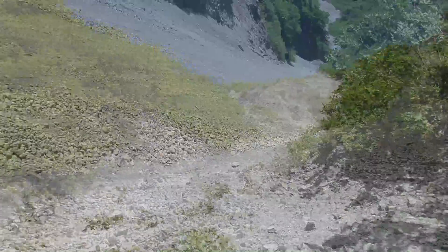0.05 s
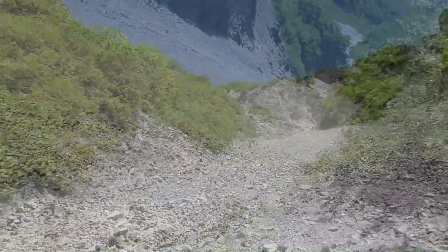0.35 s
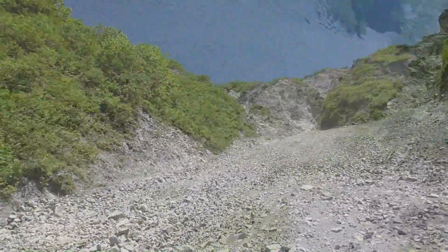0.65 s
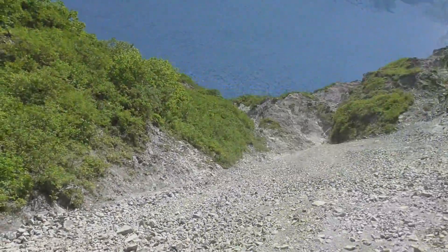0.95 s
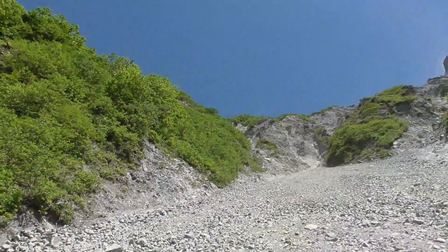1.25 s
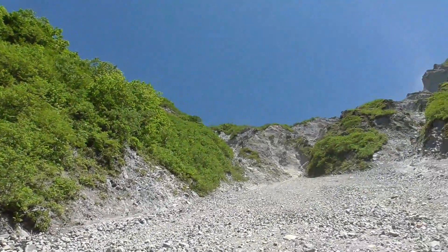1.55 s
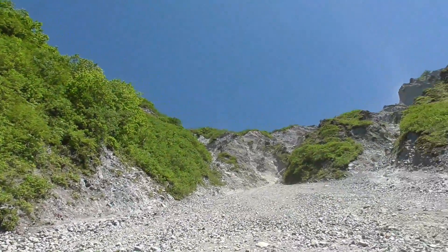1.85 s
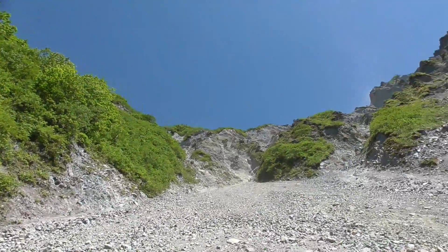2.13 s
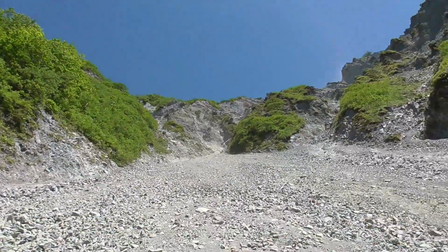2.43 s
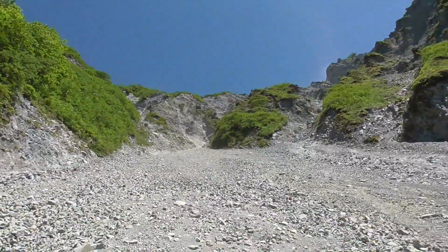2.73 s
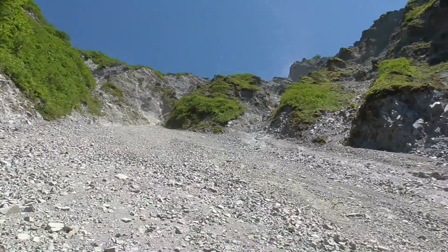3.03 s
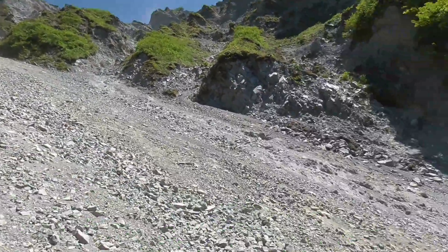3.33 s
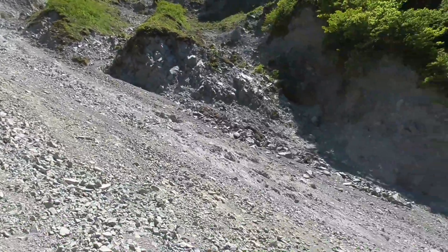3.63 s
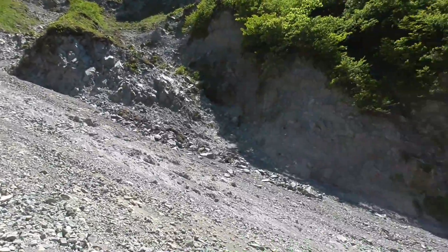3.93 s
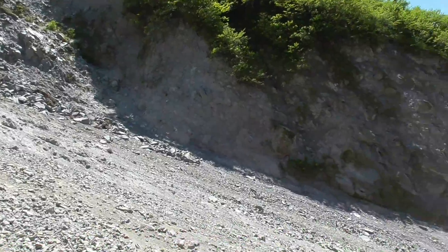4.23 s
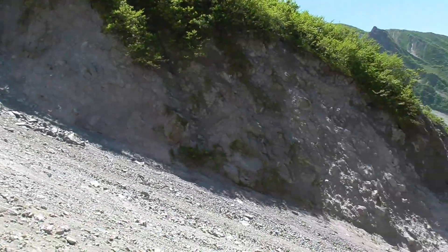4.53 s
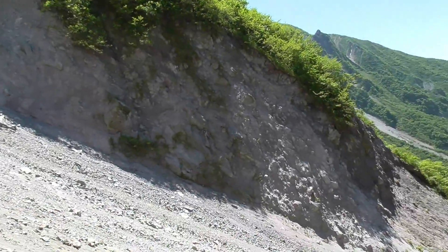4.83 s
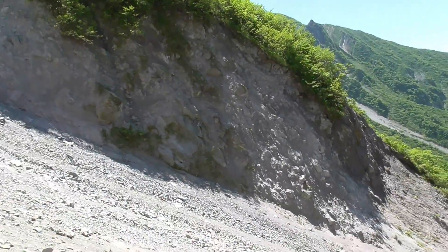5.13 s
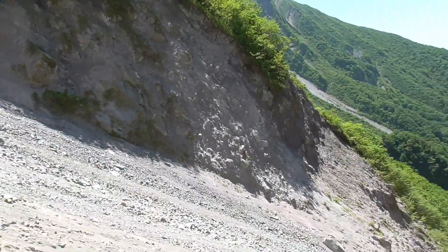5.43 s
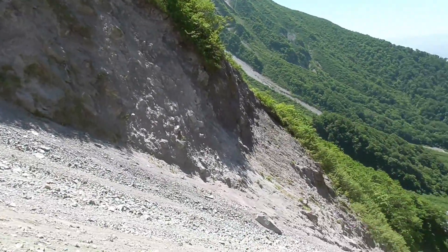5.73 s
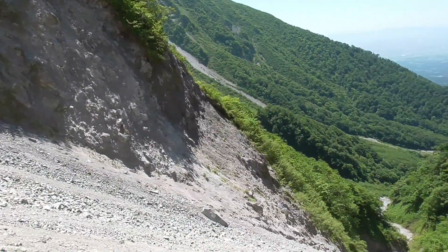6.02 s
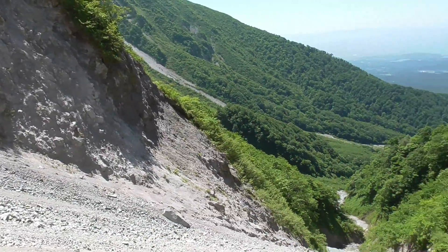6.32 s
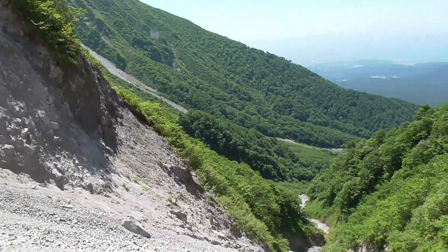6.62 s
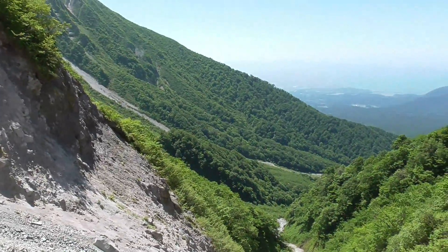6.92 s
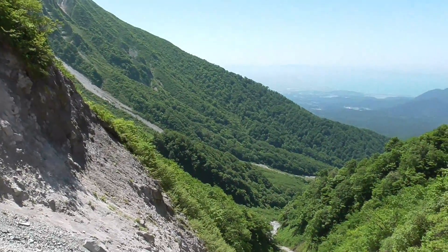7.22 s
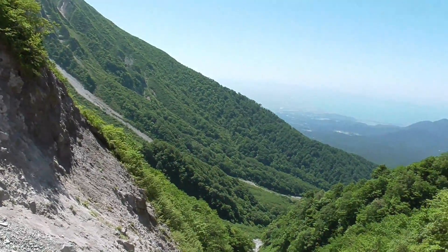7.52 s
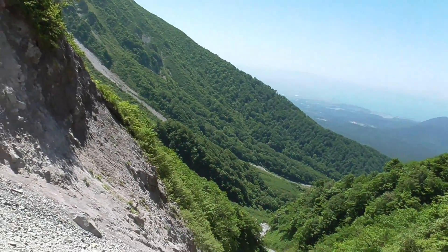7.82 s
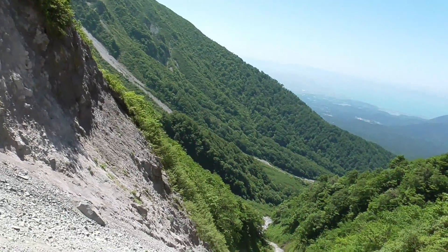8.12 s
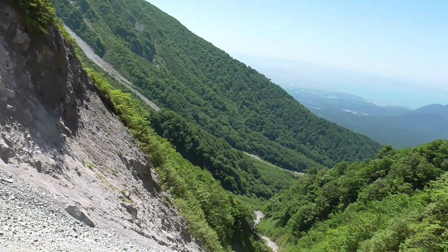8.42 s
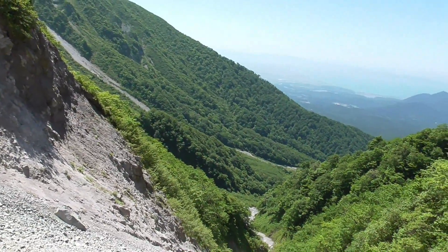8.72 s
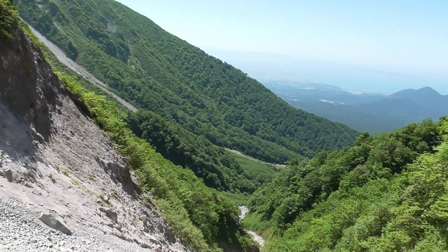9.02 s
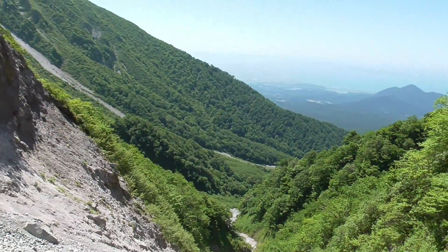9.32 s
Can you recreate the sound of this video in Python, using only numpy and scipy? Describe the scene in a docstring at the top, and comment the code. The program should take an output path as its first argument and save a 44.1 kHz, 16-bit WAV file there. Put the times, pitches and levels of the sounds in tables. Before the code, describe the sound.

For the first 3 seconds a mountain slope is fairly quiet: single stones click and scuff close by, with small dull thuds, brief spills of grit and light puffs of wind. Very faint bird whistles and insects sound far away. From about 3 seconds strong gusts hit the microphone with a low rumble, flutter and slaps, staying heavy until 6 seconds. Under them a thin trickle of grit runs and occasional stones tick; a few faint chirps come around 5 seconds. Near 6 seconds the gravel gives way, swelling by 6.5 seconds into a loud, bright hiss of tiny collisions over chattering pebbles and a dull, surging grind. The wind fades by about 8 seconds. Sharp stone clinks stand out from the slide, with a few thuds around 8 seconds, and the gravel keeps running until the end at about 9.5 seconds.

```python
"""Scree slide in mountain wind

Single stones click and scuff underfoot, then loose gravel slides: a loud hiss of tiny collisions
over a churning bed. Gusts buffet the microphone ports; the stereo image closes around the strongest.
Small birds whistle and insects sound far off in the bushes."""
import sys
import numpy as np
from scipy import signal
from scipy.fft import rfft, irfft, next_fast_len
from scipy.io import wavfile
from scipy.ndimage import uniform_filter1d, map_coordinates

SR = 44100
rng = np.random.default_rng(int(sys.argv[2]) if len(sys.argv) > 2 else 0)


def to_wav(sig):
    """Store sig (one row per channel, or 1-D mono) as 16-bit WAV at the path in sys.argv[1].

    Samples outside -1..1 are clipped; the rate is SR.
    """
    pcm = np.clip(np.atleast_2d(sig), -1, 1) * 32767
    pcm = np.round(pcm).astype(np.int16)
    wavfile.write(sys.argv[1], SR, pcm.T)  # frames by channels


N = 417186

# Spectra of torn air, grinding bed and stone clicks. Each row: frequency in Hz, relative level in dB.
# All *_spectrum tables have these columns.
RASP_SPECTRUM = [(250, -14), (500, 4), (800, -2), (1250, -10), (1800, -28), (2300, -28), (3200, -41),
                 (6000, -76)]
CHURN_SPECTRUM = [(40, -20), (150, -7), (300, 1.5), (600, 2), (1000, 1), (1400, -2), (1800, -11.5),
                  (3000, -13.5), (6000, -54)]
CHINK_SPECTRUM = [(300, -3.5), (1500, -6.5), (3000, -11.5), (4300, 7.5), (6000, 3), (8000, 6), (11000, 6.5),
                  (13500, 2.5), (16000, -26)]


def amp(db):
    """Decibels to gain."""
    return 10 ** (np.asarray(db) / 20)


def unit(x):
    """Scale to rms 1."""
    return x / np.sqrt(np.mean(x ** 2) + 1e-20)


def along(points, hz):
    """Read (Hz, value) points on a log frequency axis."""
    points_hz, values = np.transpose(points)
    return np.interp(np.log(hz + 1), np.log(points_hz + 1), values)


def curves(rows):
    """One value per sample for each column after the time."""
    times_s, *columns = np.transpose(rows)
    return [np.interp(np.arange(N) / SR, times_s, column) for column in columns]


def gains(rows):
    """dB curves as gains, fading out beyond the first and last rows."""
    t = np.arange(N) / SR
    outside_s = np.maximum(rows[0][0] - t, 0) + np.maximum(t - rows[-1][0], 0)
    return [amp(db) * np.exp(-outside_s / 0.15) for db in curves(rows)]


def wobble(rate_hz):
    """Smooth random curve, rate_hz knots a second."""
    knots = rng.standard_normal(int(N * rate_hz / SR) + 4)
    return map_coordinates(knots, [np.arange(N) * rate_hz / SR])


def filtered(x, response):
    """Zero-phase filter; response maps Hz to gain."""
    size = next_fast_len(x.shape[-1] + 8192)
    return irfft(rfft(x, size) * response(np.fft.rfftfreq(size, 1 / SR)), size)[..., :x.shape[-1]]


def stereo(pair, spectrum):
    """Colour a left/right pair, its mean at rms 1."""
    both = filtered(pair, lambda hz: amp(along(spectrum, hz)))
    return both / np.std(both.mean(axis=0))


def noise(samples=N):
    """Two independent white noises."""
    return rng.standard_normal((2, samples))


def steady(x, span_s):
    """Even out power over span_s, keeping the finer grain."""
    size = max(int(span_s * SR), 1)
    power = uniform_filter1d(uniform_filter1d(x.mean(axis=0) ** 2, size), size)
    return x / np.sqrt(np.abs(power) + 1e-9)


def add(track, start_s, sound):
    """Mix a sound into the track."""
    part = track[..., max(round(start_s * SR), 0):][..., :sound.shape[-1]]
    part += sound[..., :part.shape[-1]]


def follow(drive, db, growth):
    """Gain of db at a drive of -40 dB, rising growth dB per dB of drive."""
    return amp(db) * (drive / amp(-40)) ** growth


def surge(length_s, rise_s, sag_db_per_s, t60_s):
    """Envelope: rises, sags through 0 dB at mid-length, dies away after length_s."""
    t = np.arange(int((length_s + t60_s) * SR)) / SR
    attack = np.sin(np.pi / 2 * np.minimum(t / rise_s, 1)) ** 2
    return attack * amp(-sag_db_per_s * (t - length_s / 2) - 60 * np.maximum(t - length_s, 0) / t60_s)


def collisions(rate_hz, spread_db, life_s):
    """Envelope of random impacts, many small and a few large, each with time constant life_s."""
    hits = rng.random(N) < rate_hz / SR
    size = amp(spread_db * np.minimum(rng.standard_normal(N), 2.8))
    return np.sqrt(signal.lfilter([1], [1, -np.exp(-2 / (life_s * SR))], hits * size ** 2))


def valley(air_db=-62, insects_hz=3100, half_width_hz=170):
    """Soft hillside air and a far, wavering insect chorus."""
    air_spectrum = [(59, -17), (100, -22.5), (223, -7), (340, -8), (956, -10), (1520, -17), (1730, -26),
                    (2130, -19), (2630, -24), (3120, -18.5), (3850, -21), (6120, -27.5), (8230, -21),
                    (12600, -30), (15500, -35)]
    # Each row: time in seconds, chorus level in dB.
    insect_levels = [(0, -74), (.3, -73), (.6, -76), (1.8, -71.5), (2.3, -68), (2.8, -71), (5, -65.5)]
    (insects_db,) = curves(insect_levels)
    chorus = unit(filtered(noise(), lambda hz: 1 / (1 + ((hz - insects_hz) / half_width_hz) ** 2)))
    air = amp(air_db + 0.19 * wobble(1.9)) * stereo(noise(), air_spectrum)
    return air + amp(insects_db + 1.7 * wobble(12)) * chorus


def birds(echo_db=-6, t60_s=0.43):
    """Distant gliding whistles, smeared by the valley sides."""
    # Each row: start and length in seconds, first, middle and last pitch in Hz, level in dB.
    whistles = [(0, 0.16, 3500, 3230, 3190, -69), (0.173, 0.12, 3140, 3200, 3240, -71),
                (0.284, 0.091, 1204, 1320, 1250, -61.5), (1.282, 0.099, 4180, 4070, 3900, -68),
                (1.48, 0.1, 3650, 3750, 3820, -65), (1.587, .13, 3980, 3980, 4000, -67),
                (2.777, 0.13, 4150, 3920, 3720, -69), (4.629, 0.059, 1400, 1605, 1840, -50),
                (4.746, 0.065, 2990, 2160, 2120, -54.5), (5.0, .06, 4900, 4600, 4000, -59),
                (5.1, 0.049, 4050, 4030, 4250, -62), (5.23, 0.079, 5400, 4550, 4050, -63)]
    song = np.zeros(N)
    for start_s, length_s, *pitches_hz, db in whistles:
        progress = np.linspace(0, 1, int(length_s * SR))
        glide_hz = np.polyval(np.polyfit([0, 0.5, 1], pitches_hz, 2), progress)
        hz = glide_hz * (1 + 0.0215 * wobble(193)[:len(progress)])
        envelope = np.sqrt(np.abs(np.sin(np.pi * progress)))
        add(song, start_s, amp(db) * envelope * np.sin(2 * np.pi * np.cumsum(hz) / SR))
    t = np.arange(SR // 2) / SR
    tail = noise(len(t)) * amp(-60 * t / t60_s)
    echo = signal.fftconvolve(song[None], tail / np.linalg.norm(tail[0]), axes=1)[:, :N]
    return song + amp(echo_db) * echo


def gusts():
    """Breeze and gusts add in power. Returns strength, its torn part and each port's gain."""
    # Each row: time in seconds, level in dB.
    breeze = [(0, -70.5), (1.1, -60), (2.4, -57.5), (3.2, -34.5), (4.2, -24.5), (5.7, -27.5), (6.15, -42.5),
              (7.4, -30.5), (7.8, -49), (8.9, -49.5), (9.46, -65)]
    # A head-on gust tears into finer eddies. Each row: start and length in seconds, level in dB,
    # torn part in relative dB, left minus right in dB.
    blows = [(0.054, 0.078, -60.5, -19, 7), (0.302, 0.055, -57, -21, 1), (0.665, 0.28, -44.5, -35, -7.5),
             (1.17, 0.12, -52, -5.5, -3), (1.345, 0.084, -40, -24, -5), (1.38, 0.032, -24, -23, -14),
             (1.575, 0.063, -49.5, -18, -9), (1.696, 0.11, -41.5, -35, -2), (1.816, .13, -43, -32, 3),
             (1.994, 0.12, -51, -26, -1), (2.296, 0.19, -49, -15, -0.5), (2.558, 0.31, -34.5, -16, -9),
             (2.998, 0.45, -32.5, -14.5, -14), (3.277, .14, -17.5, -7.5, -2), (3.409, 0.22, -19, -10.5, 7),
             (3.65, 0.51, -24, -13, -1), (4.07, 0.085, -20, -3.5, 0), (4.154, .17, -21.5, 2.5, 1),
             (4.32, .11, -23, -0.5, -2), (4.414, 0.22, -28, 2.5, -1), (4.67, 0.25, -26, 3, 2),
             (4.942, 0.2, -28.5, 6, -5), (5.256, 0.21, -30.5, 1, -17), (5.414, 0.34, -28, 0, -14),
             (5.776, 0.16, -25, -3.5, -6), (5.948, 0.077, -21, -3, -13), (6.021, .06, -24.5, -11, -13),
             (6.175, 0.47, -35.5, -20, 3.5), (6.666, 0.069, -25, -19, 2), (6.837, 0.27, -34.5, -17.5, 1),
             (7.15, 0.37, -31, -9.5, -11), (8.142, 0.33, -42.5, -26, 4), (8.513, 0.18, -39.5, -24, 9)]
    power = np.repeat(amp(curves(breeze)) ** 2, 2, axis=0)
    torn_power = np.zeros(N)
    for start_s, length_s, db, torn_db, lean_db in blows:
        gust = amp(db) * surge(length_s, rise_s=0.16 * length_s, sag_db_per_s=11, t60_s=1.4 * length_s)
        add(power, start_s, np.outer(unit(amp([lean_db, 0])), gust) ** 2)
        add(torn_power, start_s, (amp(torn_db) * gust) ** 2)
    strength = np.sqrt(power.mean(axis=0))
    return strength, np.sqrt(torn_power), np.sqrt(power) / strength


def eddies(swing_gain_db=-3, rise_s=0.006, slap_gain_db=3, slap_t60_s=0.033):
    """Each eddy slaps the ports and shakes the diaphragms for a few uneven swings."""
    # Each row: start in seconds, level in dB, pitch in Hz, slap in relative dB.
    hits = [(0.305, -32, 101, -27), (1.386, -19, 142, -27), (1.593, -23, 107, -38), (2.581, -15, 112, -34),
            (3.311, -4.5, 189, -19.5), (3.634, -11.5, 200, -12), (3.785, -14, 170, -32),
            (4.17, -19, 223, -11), (4.964, -14, 256, -13.5), (5.005, -8, 259, -21), (5.054, -14, 400, -15),
            (5.128, -20, 186, -13), (5.374, -32, 204, -20), (5.581, -11, 157, -19), (5.661, -25, 194, -3.5),
            (5.71, -21, 176, -9), (5.83, -6, 247, -20.5), (6.002, -18, 137, -7), (6.7, -14, 147, -21.5)]
    out, t = np.zeros((2, N)), np.arange(SR // 10) / SR
    for start_s, db, hz, slap_db in hits:
        drift = unit(uniform_filter1d(noise(len(t)), size=200))
        phase = 2 * np.pi * np.cumsum(hz * np.exp(0.278 * drift), axis=1) / SR
        swing = amp(swing_gain_db) * t / rise_s * np.exp(1 - t / rise_s) * np.sin(phase)
        slap = stereo(noise(len(t)), RASP_SPECTRUM) * (1 - np.exp(-t / 0.0026))
        slap *= amp(slap_db + slap_gain_db - 60 * t / slap_t60_s)
        add(out, start_s, amp(db) * (swing + slap))
    return out


def wind(buffet_db=-2, flutter_db=0.5, lump_db=3, tear_db=5.5, torn_swell_db=-19):
    """Turbulence on the ports: pressure swell and buffet, plus flutter and rasp in torn gusts."""
    swell_spectrum = [(12, -16), (25, -13), (45, -7), (70, 1.5), (100, 1), (200, -73), (600, -90)]
    buffet_spectrum = [(30, -64), (60, -20), (110, 0.5), (180, 0), (260, -7.5), (400, -20.5), (700, -31),
                       (1500, -88)]
    flutter_spectrum = [(80, -44), (170, -3), (260, 2), (380, -4.5), (520, -15.5), (800, -29), (1600, -96)]

    def layer(spectrum, ripple_db):
        return steady(stereo(noise(), spectrum) * amp(ripple_db), span_s=0.068)

    strength, torn, port_gains = gusts()
    torn_share = np.minimum(torn / strength, 1) ** 2
    lumps = wobble(45)
    bursts = 0.58 * lumps + 0.34 * wobble(160)
    swell_gain = follow(strength, db=-45, growth=0.62) * amp(torn_swell_db * torn_share)
    swell = swell_gain * layer(swell_spectrum, lump_db * lumps)
    buffet = amp(buffet_db) * strength * layer(buffet_spectrum, lump_db * lumps)
    flutter = amp(flutter_db) * torn * layer(flutter_spectrum, lump_db * lumps)
    rasp = follow(torn, db=-56.5, growth=1.196) * layer(RASP_SPECTRUM, tear_db * bursts)
    # Veering wind presses harder on one port.
    return (swell + buffet + flutter + rasp + eddies()) * port_gains


def spills():
    """Handfuls of grit are pushed loose and settle: hiss over a dull grind."""
    # Each row: start in seconds, level in dB, rise and t60 in seconds.
    handfuls = [(.76, -54, 0.0035, 0.2), (1.236, -45, .001, 0.084), (1.25, -41.5, .0015, 0.058),
                (1.59, -60.5, .05, 0.19), (2.082, -52, 0.012, 0.37), (2.9, -57.5, 0.0073, 0.55),
                (4.042, -37, 0.0043, 0.025), (5.918, -26, 0.0022, 0.13), (5.94, -43, 0.053, 1),
                (6.61, -28, 0.098, 0.18), (8.81, -29, 0.0098, 0.27), (8.93, -27.5, 0.065, 0.11)]
    spill_spectrum = [(200, -1), (900, 1), (1700, -8), (2500, -7), (3200, -5.5), (4400, 2.5), (6000, -3.5),
                      (8500, 5), (11000, -0.5), (13500, -9), (16000, -21)]
    flow, t = np.zeros(N), np.arange(SR // 2) / SR
    for start_s, db, rise_s, t60_s in handfuls:
        shape = (1 - np.exp(-(t / rise_s) ** 2)) * amp(-60 * t / t60_s)
        add(flow, start_s, amp(db) * shape / shape.max())
    grains = collisions(rate_hz=2800, spread_db=-9.5, life_s=0.0016)
    return flow * stereo(grains * noise(), spill_spectrum)


def thuds(decay_cycles=0.42, crunch_t60_s=0.039):
    """A heavy stone lands in loose grit: one dead push and a crunch, no ring."""
    # Each row: start in seconds, level in dB, pitch in Hz.
    landings = [(.562, -39.5, 597), (.675, -35, 400), (0.741, -31, 1110), (1.249, -24.5, 403),
                (1.537, -36, 805), (3.328, -25.5, 1500), (7.79, -27, 700), (8.213, -25, 700),
                (8.373, -21, 600), (8.417, -23.5, 300)]
    out, t = np.zeros((2, N)), np.arange(SR // 20) / SR
    for start_s, db, hz in landings:
        push = np.sin(2 * np.pi * hz * t) * np.exp(-hz * t / decay_cycles)
        crunch = stereo(noise(len(t)), CHURN_SPECTRUM) * amp(-60 * t / crunch_t60_s)
        add(out, start_s, amp(db) * (2 * push + 0.21 * crunch))
    return out


def stones(gain_db=1, ring_db=10, ring_octaves=0.2, t60_cycles=36, knock_gain_db=3,
           settle_db=-24, settle_t60_s=0.057):
    """A nearby stone cracks, rings briefly at its own pitch and disturbs the grit."""
    # Each row: start in seconds, level in dB, ring in Hz, knock in relative dB.
    strikes = [(.3645, -47.5, 1550, -4), (0.562, -37, 7050, -20), (.6224, -47, 4260, -3),
               (.668, -38, 4560, -13), (0.7393, -28, 4460, 2), (0.7614, -40, 4660, -28),
               (.876, -38, 8910, -11), (.8928, -40, 5460, -7), (1.2339, -19, 7650, -16),
               (1.3658, -36, 10300, -7), (1.5342, -35, 4370, -8), (1.8108, -42.5, 7100, -26),
               (3.3344, -24, 7500, -27), (3.443, -35.5, 3860, -26), (3.8999, -28.5, 8800, -21),
               (4.0303, -26.5, 7250, -38), (4.4558, -13, 13600, -16.5), (4.6682, -31, 5350, -17),
               (4.8427, -31.5, 5670, -11), (5.1718, -37, 2930, -19), (5.2307, -42, 5140, -10),
               (5.306, -29, 6250, -18), (5.737, -38, 3630, -12), (5.863, -28, 7580, -16),
               (6.238, -21, 9600, -24), (6.3493, -14, 4200, -30), (6.5733, -18.5, 7400, -26),
               (6.715, -13.5, 7450, -39), (7.289, -23, 9300, -25), (7.574, -9, 9100, -38),
               (7.6842, -12, 9300, -47), (7.72, -11, 8160, -45), (7.755, -13, 10230, -37),
               (7.7988, -5, 8800, -46), (7.9342, -13, 9540, -37), (8.3393, -10.5, 8300, -25),
               (8.3664, -14, 9240, -41), (8.8305, -14, 10100, -30), (8.983, -9.5, 8200, -20),
               (8.998, -13.5, 4810, -14), (9.0368, -13, 8900, -35), (9.0811, -11, 9250, -35),
               (9.1622, -9.5, 8300, -22)]
    knock_spectrum = [(200, -3), (700, 8), (1300, -8), (2100, 6), (2800, -15), (5000, -32)]
    out, t = np.zeros((2, N)), np.arange(SR // 10) / SR
    for start_s, db, ring_hz, knock_db in strikes:
        def colour(hz):
            octaves = np.log2((hz + 1) / ring_hz)
            peak_db = ring_db * np.exp(-(octaves / ring_octaves) ** 2)
            # A larger stone rings lower and gives little above its ring.
            skirt_db = -4.8 * np.maximum(octaves, 0) + 1.2 * np.minimum(octaves, 0)
            return amp(along(CHINK_SPECTRUM, hz) + peak_db + skirt_db)

        crack = unit(filtered(noise(len(t)), colour))
        knock = amp(knock_db + knock_gain_db) * stereo(noise(len(t)), knock_spectrum)
        settle = crack * amp(settle_db - 60 * t / settle_t60_s)
        click = (crack + knock) * amp(-60 * t * ring_hz / t60_cycles) + settle
        add(out, start_s, amp(db + gain_db) * click / np.abs(click.mean(axis=0)).max())
    return out


def gravel_motion():
    """Envelopes of grit, pebbles and deep bed. Faster flow carries more fine grit; the bed surges."""
    # A trickle, then the slide. Each row: time in seconds, grit level in dB.
    flow = [(3.3, -72), (3.83, -63.5), (4.21, -56.5), (4.45, -52), (5.32, -66), (5.65, -67), (5.89, -51),
            (6.04, -48.5), (6.32, -42), (6.56, -35.5), (6.66, -37), (7.54, -33), (7.66, -32.5),
            (7.97, -32.5), (8.21, -29.5), (9.08, -34), (9.46, -32)]
    # Each row: time in seconds, pebble level in dB at a flow of -40 dB.
    coarseness = [(3.5, -46), (5.9, -43), (6.35, -43.5), (7.3, -43.5), (8.0, -48), (8.6, -44.5),
                  (9.46, -41.5)]
    # The bed gives way. Each row: start and length in seconds, level in dB.
    slips = [(0.283, 0.41, -67.5), (0.977, 0.3, -64), (2.06, 0.081, -64), (5.85, .45, -46),
             (6.37, 0.67, -39.5), (6.788, 0.54, -38), (7.09, 0.4, -35), (7.807, 0.35, -38.5),
             (8.135, 0.19, -36), (8.372, 0.7, -38), (9.047, .36, -42.5)]
    (grit,) = gains(flow)
    (pebble_db,) = curves(coarseness)
    bed_power = np.zeros(N)
    for start_s, length_s, db in slips:
        slip = amp(db) * surge(length_s, rise_s=0.05, sag_db_per_s=1, t60_s=0.66)
        add(bed_power, start_s, slip ** 2)
    return grit, follow(grit, pebble_db, growth=0.82), np.sqrt(bed_power)


def bounces():
    """Larger pebbles hop out of the flow and tick, clearest in a thin trickle."""
    grit, _, _ = gravel_motion()
    ticks = collisions(rate_hz=55, spread_db=3.5, life_s=0.0006)
    return follow(grit, db=-49, growth=0.82) * stereo(ticks * noise(), CHINK_SPECTRUM)


def slide(grit_db=2, pebble_db=1, churn_db=-0.5, clump_db=0.4):
    """Thousands of collisions a second: grit hisses, pebbles chatter, the bed grinds dully."""
    # Each row: time in seconds, spread of collision sizes in dB.
    unevenness = [(3.2, 6), (5.5, 7), (6.5, 2.5), (7.3, -1), (7.6, 4), (7.8, 2), (8.1, -2.5), (8.7, 3.5),
                  (9.46, 3)]
    grit_spectrum = [(2500, -44), (5500, -6.5), (7200, 7), (8500, 9), (10500, 6.5), (12000, 1.5),
                     (14000, -10), (16000, -18)]
    pebble_spectrum = [(1000, 1), (1800, -8.5), (2200, -4.5), (3100, -7.5), (4000, 2), (4700, 4), (6000, 1),
                       (8000, -18), (14000, -64)]

    def layer(hits, spectrum):
        return steady(stereo(hits * noise(), spectrum), span_s=0.22)

    grit, pebbles, bed = gravel_motion()
    (spread_db,) = curves(unevenness)
    clumps = amp(clump_db * wobble(50))
    impacts = clumps * collisions(rate_hz=3600, spread_db=spread_db, life_s=0.0006)
    chatter = np.hypot(impacts, 0.56 * collisions(rate_hz=2300, spread_db=spread_db, life_s=0.00061))
    grinding = clumps * collisions(rate_hz=1100, spread_db=2.5, life_s=0.004)
    return (amp(grit_db) * grit * layer(impacts, grit_spectrum)
            + amp(pebble_db) * pebbles * layer(chatter, pebble_spectrum)
            + amp(churn_db) * bed * layer(grinding, CHURN_SPECTRUM))


def stereo_width(x):
    """The image starts wide, closes in the gale and half reopens, on a set timeline."""
    # Each row: time in seconds, side gain in dB for bass, middle and treble.
    widths = [(0, 11.5, -4.5, 1), (3.42, -1.5, -7, -1), (3.6, -22, -29, -39), (3.75, -72, -68, -40),
              (4.85, -60, -62, -40), (5.05, -18, -21, -26), (6.0, -9.5, -15, -3), (6.75, -5, -57, -9),
              (7.35, -25, -60, -78), (7.85, -20.5, -67, -25), (8.6, -8.5, -52, -9.5), (9.46, -15, -43, -3)]
    # Crossovers. Each row: frequency in Hz, share from 0 to 1.
    bass_share = [(200, 0.75), (400, 0.069), (900, 0)]
    treble_share = [(3200, 0), (5500, 0), (7500, 0.58)]
    mid, side = (x[0] + x[1]) / 2, (x[0] - x[1]) / 2
    bass = filtered(side, lambda hz: along(bass_share, hz))
    treble = filtered(side, lambda hz: along(treble_share, hz))
    side = np.sum(amp(curves(widths)) * [bass, side - bass - treble, treble], axis=0)
    return np.array([mid + side, mid - side])


def scene():
    """Wind and stones close by, the valley behind."""
    return wind() + slide() + bounces() + stones() + thuds() + spills() + birds() + valley()


def record(dry):
    """Varying stereo width, then a band limit."""
    top_hz, taper_hz = 16050, 300
    return filtered(stereo_width(dry), lambda hz: np.clip((top_hz - hz) / taper_hz, 0, 1))


dry = scene()
out = record(dry)
to_wav(out)
```